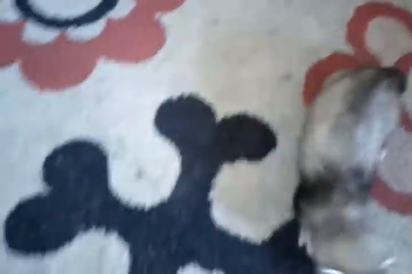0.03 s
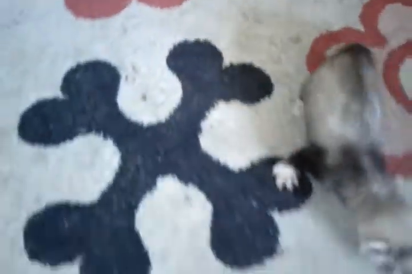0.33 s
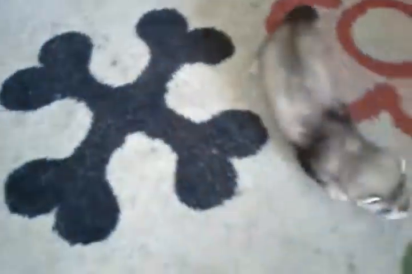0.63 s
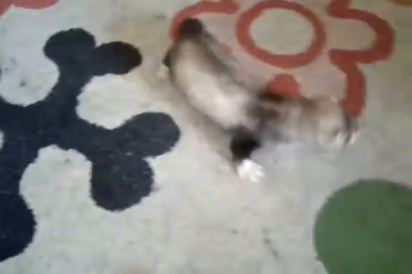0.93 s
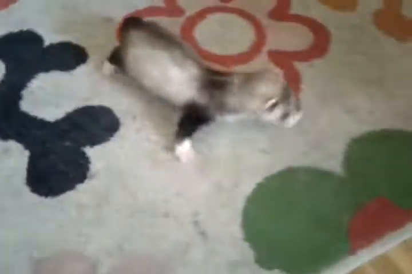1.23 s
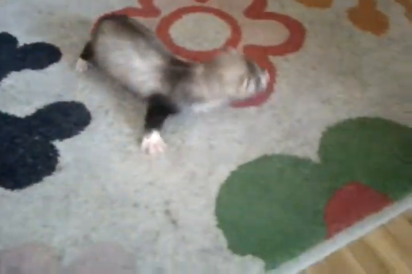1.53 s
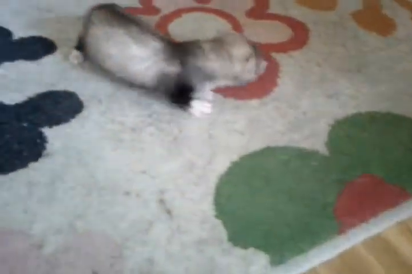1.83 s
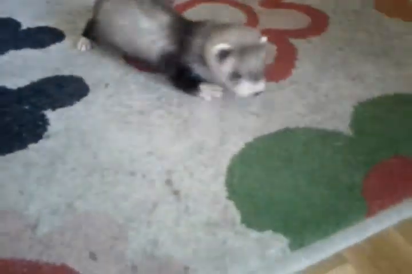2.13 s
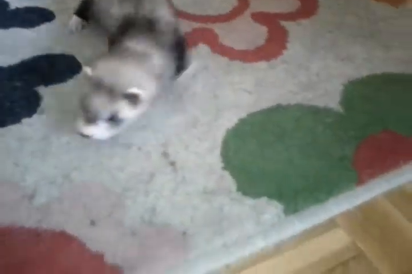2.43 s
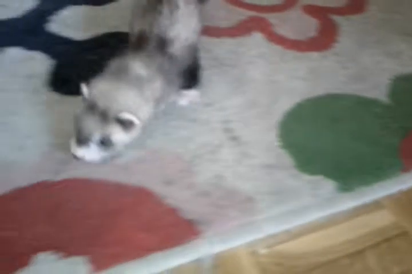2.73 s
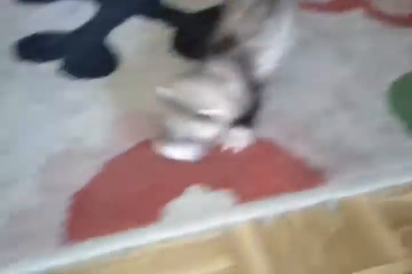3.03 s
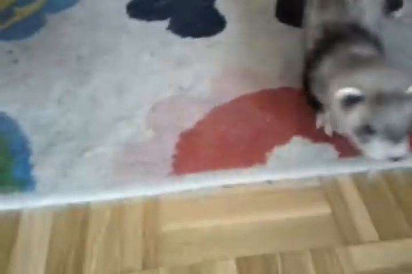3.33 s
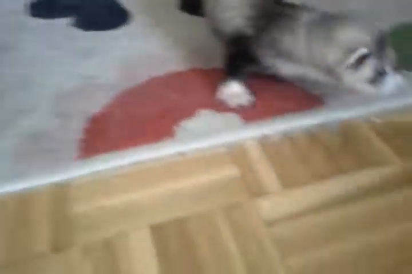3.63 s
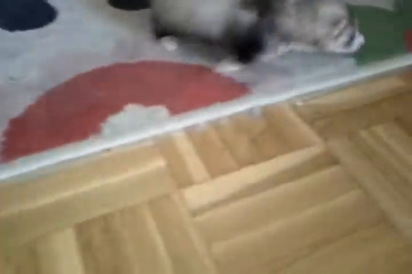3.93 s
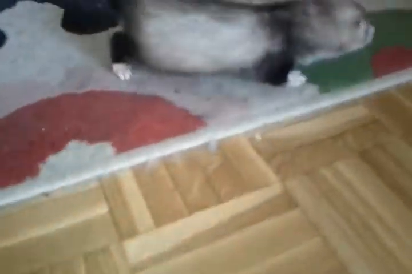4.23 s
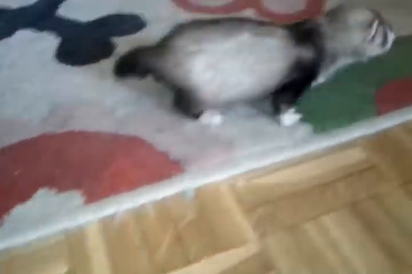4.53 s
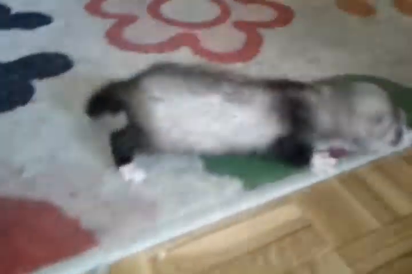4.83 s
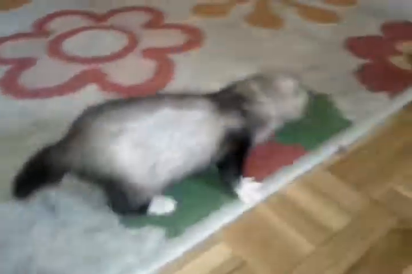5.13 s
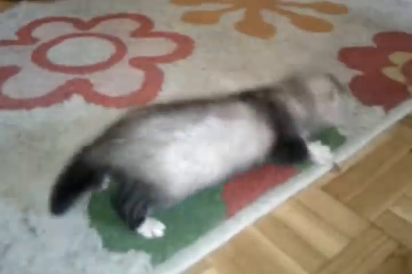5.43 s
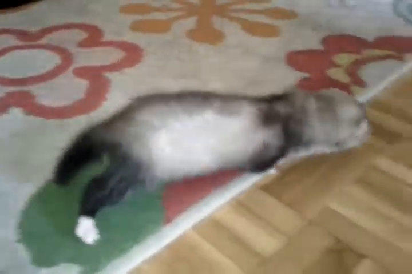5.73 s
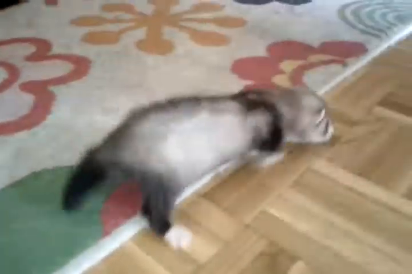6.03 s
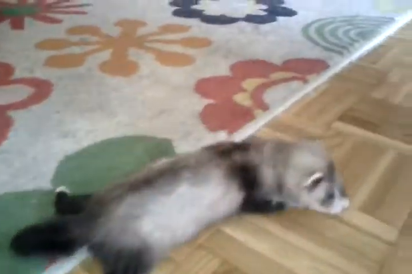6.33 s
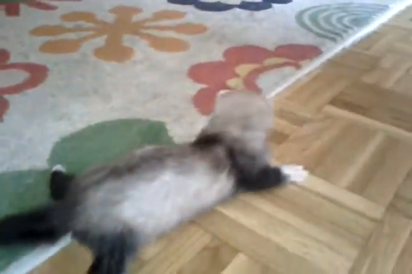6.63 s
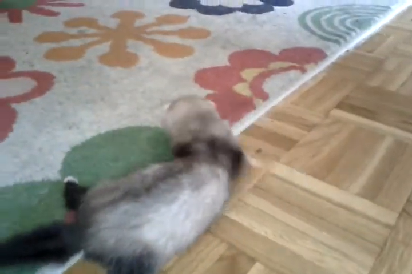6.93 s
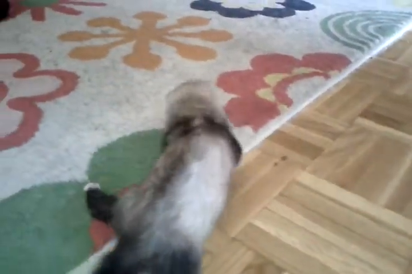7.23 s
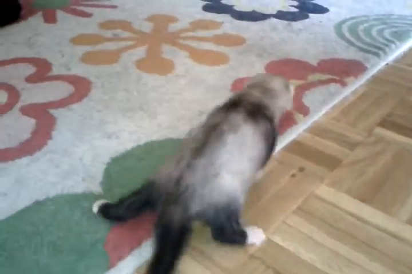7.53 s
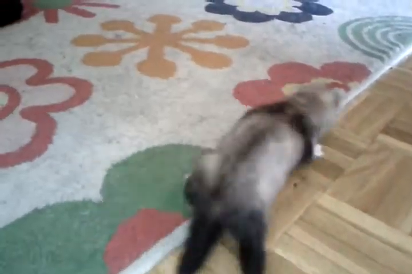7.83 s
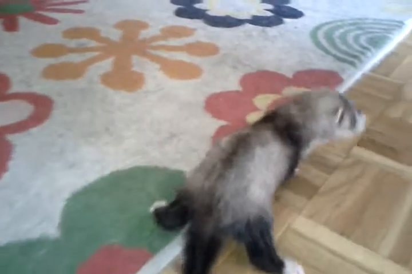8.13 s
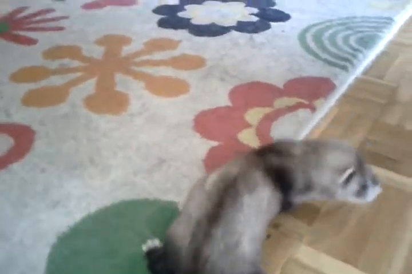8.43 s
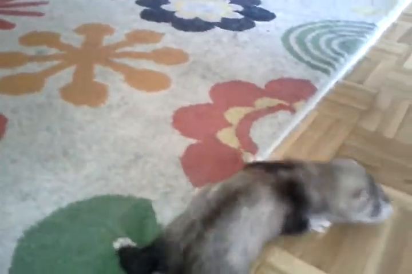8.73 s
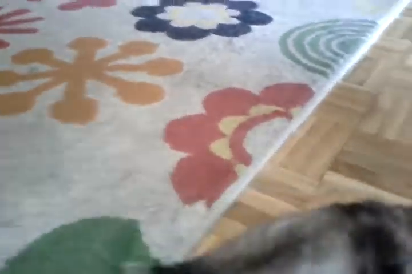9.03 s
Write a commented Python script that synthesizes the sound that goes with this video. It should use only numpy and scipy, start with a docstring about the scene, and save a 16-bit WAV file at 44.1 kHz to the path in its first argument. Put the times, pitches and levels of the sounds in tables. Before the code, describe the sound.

A ferret clucks softly in short runs, with claw ticks, scuffs, a brief metal jingle and camera handling clicks over steady hiss.

```python
"""A ferret potters over rug and parquet in a living room, its vocal folds puffing out a few soft clucks.
Claws tick, fur and paws scuff, and a piece of light metal jingles twice, near 1.5 and 1.8 s.
A long chuckle follows, six or seven clucks a second, while fingers click and thump on a camera case.
After more ticks and scuffs comes another run of clucks, from about 6 s; a few last ticks close the scene.
Steady hiss and a faint hum lie under it all."""
import sys
import numpy as np
from scipy import signal
from scipy.fft import rfft, irfft, next_fast_len
from scipy.io import wavfile

SR = 44100
rng = np.random.default_rng(int(sys.argv[2]) if len(sys.argv) > 2 else 0)


def waveform_to_disk(signal):
    """Save audio, clipped to [-1, 1], as 16-bit WAV at the path in sys.argv[1]."""
    frames = np.transpose(np.atleast_2d(signal))
    scaled = np.clip(frames, -1, 1) * 32767
    samples = np.round(scaled).astype(np.int16)
    wavfile.write(sys.argv[1], SR, samples)


N = 399987
TIME = np.arange(N) / SR

# Cue levels are pre-fader: scene() sets the balance.
# the ferret's clucks: (time [s], length [s], nominal top pitch [Hz], overtone level [dB])
CLUCK_CUES = [(0.093, 0.034, 286.5, -56), (0.251, 0.032, 323.7, -56), (0.354, 0.008, 385, -59),
              (0.475, 0.031, 330.4, -45), (2.36, 0.027, 296.5, -47.5), (2.501, 0.04, 321, -47),
              (2.649, 0.034, 325.7, -45.5), (2.79, 0.041, 330, -46.5), (2.926, 0.034, 325, -45),
              (3.061, 0.041, 337, -45), (3.144, 0.036, 338.5, -45), (3.301, 0.032, 291.8, -46),
              (3.468, 0.015, 336, -48.5), (3.618, 0.03, 313, -46.5), (3.774, 0.037, 352.3, -44),
              (3.938, 0.029, 348.6, -43.5), (4.221, 0.027, 281, -51), (5.762, 0.033, 348, -60),
              (6.008, 0.0066, 359, -63), (6.128, 0.026, 330.3, -47), (6.415, 0.032, 297.5, -46),
              (6.582, 0.037, 330.5, -46), (6.77, 0.03, 329, -46.5), (6.938, 0.023, 288, -53),
              (7.072, 0.038, 356, -45.5), (7.224, 0.036, 304, -49.5), (7.406, 0.022, 303, -51.5),
              (7.568, 0.019, 311, -52)]
# weight of the voice as the ferret wanders: (time [s], fundamental against overtones [dB])
VOICE_WEIGHT = [(0.3, -8.5), (2.4, -7), (3.1, -5), (4.0, -9), (6.1, -7.5), (6.45, -12.5), (7.1, -17),
                (7.6, -10)]
# hard ticks on the floor: (time [s], peak [dB], centre [Hz], width [octaves])
TICK_CUES = [(0.2036, -22.5, 2800, 3.3), (0.2068, -27.5, 1980, 0.63), (0.2173, -27, 2200, 0.55),
             (0.6472, -37.5, 1290, 3.1), (1.013, -25, 2220, 3), (1.365, -32, 756, 1.7),
             (1.399, -39, 1390, 3.8), (2.576, -30, 3200, 1.9), (2.713, -25.5, 4740, 0.62),
             (2.8421, -18.5, 2610, 1.87), (3.1722, -32, 3000, 2.1), (4.4208, -27, 1260, 1.96),
             (4.445, -34, 3900, 1.1), (4.457, -13, 2750, 0.85), (4.46, -23, 4600, 0.46),
             (4.5522, -33.5, 4530, 1), (4.597, -33, 2150, 2.2), (4.947, -36, 600, 3.8),
             (4.9774, -24, 3000, 1.9), (5.2234, -43, 935, 1.1), (5.6098, -41, 3700, 1.5),
             (8.0132, -39.5, 2960, 1.5), (8.0588, -39.5, 4000, 1.2), (8.3002, -24, 1540, 1.34),
             (8.404, -26, 2840, 0.7), (8.844, -27, 2740, 1.6), (8.8485, -25, 2420, 1.36)]
# scuffs on rug and floor: (peak time [s], length [s], level [dB], low edge [Hz])
SCUFF_CUES = [(0.241, 0.027, -39.5, 3220), (0.941, 0.098, -47, 1350), (1.016, 0.13, -46.5, 1300),
              (1.171, 0.011, -46.5, 3470), (2.267, 0.028, -49, 3200), (2.731, 0.049, -44.5, 2260),
              (2.884, 0.082, -44.5, 1700), (3.191, 0.052, -54, 1400), (3.476, 0.029, -50, 4020),
              (3.645, 0.026, -52.5, 3500), (3.894, 0.027, -42.5, 3830), (4.367, 0.065, -48.5, 2380),
              (4.475, 0.11, -43, 1600), (4.974, 0.034, -43.5, 1290), (5.334, 0.047, -52, 1800),
              (8.546, 0.032, -54, 3000), (8.844, 0.066, -48, 1310)]
# how busily fur and paws rustle: (time [s], level [dB])
RUSTLE_RIDE = [(0, -56), (0.7, -61), (1.35, -66), (2.2, -68.5), (2.6, -61), (3.0, -52), (3.5, -62.5),
               (4.1, -64.5), (4.55, -52), (4.8, -79), (7.9, -74.5), (8.15, -54.5), (8.5, -65.5),
               (8.65, -72), (9.07, -68)]
# shakes of the metal piece: (peak time [s], rise [s], fall [s], level [dB])
SHAKE_CUES = [(1.499, 0.00038, 0.0028, -31), (1.521, 0.023, 0.057, -42.5), (1.565, 0.027, 0.051, -62),
              (1.771, 0.022, 0.014, -49.5), (1.803, 0.0013, 0.0034, -36.5), (1.833, 0.01, 0.0074, -38.5),
              (1.902, 0.00049, 0.0061, -38.5)]
# ringing modes of the metal: (frequency [Hz], relative level [dB], t60 [s])
METAL_MODES = [(4270, -19, .05), (4520, -19, .1), (5505, -18, .1), (5950, -13, .02), (6195, -12, .08),
               (6338, -5, .19), (6372, -7, .14), (6410, -8, .015), (7270, -18, .08), (7646, -15, .14),
               (8350, -15, .12)]
# fingers on the camera case: (time [s], click [dB], thump [dB], thump pitch [Hz])
CASE_CUES = [(3.0352, -9, -23, 750), (3.2337, -28.5, -25.5, 274), (3.3563, -20.5, -32, 302),
             (4.081, -39, -37, 168), (4.124, -25, -33, 197), (4.127, -28.5, -37, 250)]
# tone of the room's reflections: (frequency [Hz], relative level [dB])
ROOM_EQ = [(100, -9), (330, 7), (700, 3.5), (1200, 7), (2500, -4), (5000, 1), (8000, -3)]
# tone of room murmur and microphone hiss: (frequency [Hz], relative level [dB])
HISS_EQ = [(25, -21), (50, -17.5), (88, -3), (233, -3), (303, -1), (444, -2), (635, -4.5), (1200, -7.5),
           (2300, -9), (3200, -12.5), (4820, -12), (6410, -7.5), (7500, -14.5), (9000, -23.5)]
# the two tones of the hum: (time [s], lower tone [dB], upper tone [dB])
HUM_RIDE = [(0, -71.5, -76), (1.4, -71, -83), (1.95, -70, -77), (2.1, -79, -77.5), (4.3, -77, -75.5),
            (5.0, -84, -86.5), (9.07, -89, -74)]


def ferret(short_s=0.018, full_s=0.0334, climb_octaves=0.186, mid_pitch_hz=325, open_mouth_hz=831):
    """Runs of clucks: full ones climb with the mouth wide; short or high ones favour the fundamental."""
    out = np.zeros(N)
    weight_times, weights_db = np.transpose(VOICE_WEIGHT)
    for s, length, top_hz, level_db in CLUCK_CUES:
        opening, height = min(length / full_s, 1), top_hz / mid_pitch_hz
        climb = climb_octaves * np.clip((length - short_s) / (full_s - short_s), 0, 1)
        weight_db = np.interp(s, weight_times, weights_db)
        thinning_hz = 10.5 * (np.median(weights_db) - weight_db)  # a thinner voice has a higher vowel
        mouth_hz = (open_mouth_hz + thinning_hz) * height * opening ** 0.28
        fundamental_db = level_db + weight_db + 30.5 * np.log2(height) + 16 * (1 - opening)
        add(out, s, cluck(length, top_hz / 2 ** climb, top_hz, fundamental_db, level_db, mouth_hz))
    return out


def cluck(length, start_hz, top_hz, fundamental_db, overtones_db, mouth_hz,
          droop=0.071, attack_s=0.00017, close_s=0.0065, release_s=0.0056, grow_db=5,
          sweep=0.2, mouth_q=0.89, throat_hz=1150, throat_q=0.54):
    """A brief burst of vocal-fold puffs: the pitch arches up and sags while the mouth opens and shuts."""
    size = SR // 12
    t = np.arange(size) / SR
    progress = t / length
    crest = np.clip(0.75 + .09 * rng.standard_normal(), .35, .85)
    climb = 1 - np.clip(1 - progress / crest, 0, 1) ** 2
    sag = droop * np.clip((progress - crest) / (1 - crest), 0, 1) ** 2
    jitter, shimmer = .017 * drift(250, size), from_db(1.1 * drift(300, size))
    pitch = start_hz * (top_hz / start_hz) ** (1.512 * climb - .45) * (1 - sag + jitter)
    phase = 2 * np.pi * np.cumsum(pitch) / SR - np.pi / 2
    harmonics = np.arange(2, 12)[:, None]
    hz = harmonics * pitch
    # mouth and throat resonate; a wider mouth rings higher
    gape = np.sin(np.pi * np.minimum(progress, 1) ** 1.8) - .65
    vowel_hz = mouth_hz * (1 + sweep * gape)
    mouth = 1 / (1 + 1j * mouth_q * (hz / vowel_hz - vowel_hz / hz)) ** 2
    throat = 1 / (1 - (hz / throat_hz) ** 2 + 1j * hz / throat_hz / throat_q)
    # no two puffs are alike, so each overtone wavers by itself
    waver = from_db(2 * np.array([drift(110, size) for _ in harmonics]))
    weight = mouth * throat * waver
    weight = weight / np.linalg.norm(weight, axis=0)
    overtones = np.sum(weight * np.exp(1j * harmonics * phase), axis=0).real
    turbulence = rms_one(band(rng.standard_normal(size), 350, 1300))
    breath = from_db(-11.5) * turbulence * (1 + np.cos(phase)) / 2  # rides on each puff
    opening = from_db(grow_db * gape)
    tail_s = np.maximum(t - 0.99 * length, 0)
    fundamental = from_db(fundamental_db) * np.cos(phase + np.pi / 2)
    fundamental *= np.sqrt(opening) * np.exp(-tail_s / release_s)
    vowel = from_db(overtones_db) * (overtones + breath) * opening * np.exp(-tail_s / close_s)
    return -np.sqrt(2) * (fundamental + vowel) * (1 - np.exp(-t / attack_s)) * shimmer


def ticks(crunch_s=0.0017, bounce_s=.0027, bounce=0.16, body_db=-13,
          skid_db=-24, skid_s=0.014, skid_dulling=0.86):
    """Small things and claws hit the floor: a contact with a short crunch, a bounce and a brief skid."""
    out, t = np.zeros(N), np.arange(SR // 10) / SR
    for s, peak_db, centre_hz, octaves in TICK_CUES + claws():
        low_hz, high_hz = centre_hz / 2 ** (octaves / 2), centre_hz * 2 ** (octaves / 2)
        graze = np.interp(peak_db, [-30, -12], [.6, .17])  # light touches graze, hard ones hit cleanly
        force = (t == 0) + graze * rng.standard_normal(len(t)) * np.exp(-t / crunch_s)
        tick = band(force, low_hz, high_hz) + from_db(body_db) * band(force, 360, 5400, order=1)
        tick *= from_db(peak_db) / np.abs(tick).max()
        grit = grains(per_s=3000, spread_db=5.5, size=len(t))
        skid = rms_one(band(grit, skid_dulling * low_hz, skid_dulling * high_hz))
        add(out, s, tick + from_db(peak_db + skid_db) * skid * np.exp(-t / skid_s))
        add(out, s + bounce_s, bounce * tick)
    return out


def claws(per_s=3, lift_db=14.5, spread_db=2, centre_hz=3600, octaves=3.4):
    """Extra tick cues: light claw touches at random moments, louder while the ferret is busy."""
    draws = rng.random((round(per_s * N / SR), 3))
    return [(s, rustle_db(s) + lift_db + spread_db * (2 * force - 1), centre_hz * 2 ** (tone - .5), octaves)
            for s, force, tone in draws * [N / SR, 1, 1]]


def scuffs(top_hz=7200, rise_share=0.41, body_db=-16, catch_db=2.5):
    """Fibres catch and let go thousands of times a second under each stroke."""
    out, t = np.zeros(N), np.arange(-SR // 2, SR // 2) / SR
    for s, length, level_db, low_hz in SCUFF_CUES:
        friction = grains(per_s=7000, spread_db=2.5, size=len(t))
        rub = rms_one(band(friction, low_hz, top_hz))
        body = from_db(body_db) * rms_one(band(friction, 250, 3300, order=1))
        gain = from_db(level_db + catch_db * drift(130.65, len(t)))
        stroke = gain * (rub + body) * swell(t, rise_share * length, (1 - rise_share) * length)
        add(out, s + t[0], stroke[t >= -s])
    return out


def rustle(low_hz=1800, high_hz=6900, patchy_db=3):
    """Fur and paws brush the rug in small uneven strokes."""
    friction = rms_one(band(grains(per_s=7000, spread_db=0), low_hz, high_hz))
    return from_db(rustle_db(TIME) + patchy_db * drift(25)) * friction


def rustle_db(s):
    """The rustle's level ride at time s."""
    return np.interp(s, *np.transpose(RUSTLE_RIDE))


def jingle(ring_db=-4.5, rasp_db=-6, shrill_db=-7, rattle_db=-21):
    """Small metal parts rub and knock together; their modes store the energy and sing on."""
    stroke = sum(from_db(level_db) * swell(TIME - s, rise, fall) for s, rise, fall, level_db in SHAKE_CUES)
    rings = np.zeros(N)
    for hz, level_db, t60 in METAL_MODES:
        energy_kept = from_db(-120 / (t60 * SR))  # per sample
        envelope = np.sqrt(signal.lfilter([1 - energy_kept], [1, -energy_kept], stroke ** 2 + 1e-18))
        # contacts nudge the ring's strength and phase
        gain = from_db(level_db + 2 * drift(60))
        rings += gain * envelope * np.sin(2 * np.pi * hz * TIME + 1.25 * drift(45))
    contacts = grains(per_s=4600, spread_db=5)
    rasp = from_db(rasp_db) * rms_one(band(contacts, 3770, 7600, order=3))
    shrill = from_db(shrill_db) * rms_one(band(contacts, 6200, 6550))
    rattle = from_db(rattle_db) * rms_one(band(contacts, 200, 510, order=1))
    return np.sqrt(2) * from_db(ring_db) * rings + stroke * (rasp + shrill + rattle) + squeak()


def squeak(s=1.768, rise_s=0.013, fall_s=0.019, level_db=-50, hz=4510):
    """The metal sticks and slips for a moment on one of its modes."""
    return from_db(level_db) * swell(TIME - s, rise_s, fall_s) * np.sin(2 * np.pi * hz * TIME + drift(150))


def handling(thump_cycles=0.63, crunch=0.062, crunch_s=0.0033, knock_db=-7):
    """Fingers click the case right at the microphone, with a hollow knock and a heavily damped thump."""
    out, t = np.zeros(N), np.arange(SR // 25) / SR
    for s, click_db, thump_db, thump_hz in CASE_CUES:
        force = (t == 0) + crunch * rng.standard_normal(len(t)) * np.exp(-t / crunch_s)
        click, knock = band(force, 3400, 7650), band(force, 590, 1400)
        thump = np.sin(2 * np.pi * thump_hz * t) * np.exp(-t * thump_hz / thump_cycles)
        body = band(thump, 110, 4000, order=1) + from_db(knock_db) * knock / np.abs(knock).max()
        add(out, s, from_db(click_db) * click / np.abs(click).max() + from_db(thump_db) * body)
    return out


def room(send, t60=0.41, build_s=0.0014):
    """Dense reflections from walls and furniture, building up and dying away."""
    t = np.arange(SR // 2) / SR
    envelope = from_db(-60 * t / t60) * (1 - np.exp(-(t / build_s) ** 2))
    response = coloured(rng.standard_normal(len(t)), ROOM_EQ) * envelope
    return signal.fftconvolve(send, response / np.linalg.norm(response))[:N]


def hiss(level_db=-57.5):
    """An even bed of room murmur and microphone hiss."""
    return from_db(level_db) * coloured(rng.standard_normal(N), HISS_EQ)


def hum(tones_hz=(66, 99)):
    """Two faint low tones waver in level and phase."""
    out = np.zeros(N)
    times, *rides = np.transpose(HUM_RIDE)
    for hz, ride_db in zip(tones_hz, rides):
        gain = from_db(np.interp(TIME, times, ride_db) + 1.5 * drift(6))
        out += np.sqrt(2) * gain * np.sin(2 * np.pi * hz * TIME + .4 * drift(4.6))
    return out


def from_db(db):
    """Decibels to gain."""
    return 10 ** (np.asarray(db) / 20)


def rms_one(x):
    """Scale to rms 1."""
    return x / np.sqrt(np.mean(x ** 2) + 1e-20)


def coloured(x, eq):
    """Shape noise with an EQ curve drawn on a log-frequency axis; rms 1."""
    size = next_fast_len(len(x))
    hz = np.arange(size // 2 + 1) * SR / size
    eq_hz, eq_db = np.transpose(eq)
    gain = from_db(np.interp(np.log(np.maximum(hz, 1)), np.log(eq_hz), eq_db))
    return rms_one(irfft(rfft(x, size) * gain, size)[:len(x)])


def band(x, low_hz, high_hz, order=2):
    """Causal band-pass."""
    edges = [low_hz, min(max(high_hz, low_hz * 1.05), SR * .45)]
    return signal.sosfilt(signal.butter(order, edges, "band", fs=SR, output="sos"), x + 1e-18)


def drift(rate, size=N):
    """Random wobble of spread about 1 that turns `rate` times a second."""
    knots = rng.standard_normal(size // 20 + 2)
    return np.interp(np.arange(size) * rate / SR, np.arange(len(knots)), knots)


def add(track, s, sound):
    """Mix a sound into the track from time s on."""
    start = max(round(s * SR), 0)
    track[start:start + len(sound)] += sound[:max(N - start, 0)]


def swell(t, rise, fall):
    """A stroke builds up as a bell curve until t = 0, then dies away."""
    return np.exp(np.where(t < 0, -(t / rise) ** 2 / 2, -np.abs(t) / fall))


def grains(per_s, spread_db, size=N):
    """Random tiny contacts of uneven strength; rms 1."""
    strength = from_db(spread_db * np.minimum(rng.exponential(1, size), 4)) * rng.choice([-1, 1], size)
    return rms_one(strength * (rng.random(size) < per_s / SR))


def scene():
    """The mix: ferret, floor and metal feed the room reverb; handling, hiss and hum stay dry."""
    voice = from_db(2.96) * ferret()
    tick = ticks()
    scuff = from_db(-3.5) * (scuffs() + rustle())
    metal = from_db(2) * jingle()
    send = from_db(-13.5) * voice + from_db(-6.5) * tick + from_db(-6) * scuff + from_db(-3) * metal
    return voice + tick + scuff + metal + room(send) + handling() + hiss() + hum()


def record(dry):
    """The top end rolls off from 7 kHz and is cut away near 9 kHz."""
    soft = signal.fftconvolve(dry, signal.firwin(41, 8000, fs=SR), "same")
    return signal.fftconvolve(soft, signal.firwin(161, 8780, window=("kaiser", 8), fs=SR), "same")


dry = scene()
out = record(dry)
waveform_to_disk(out)
```